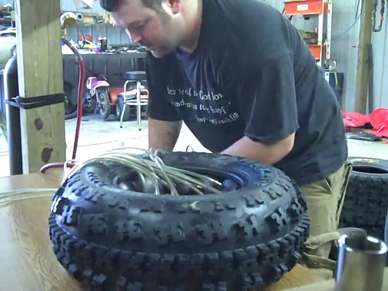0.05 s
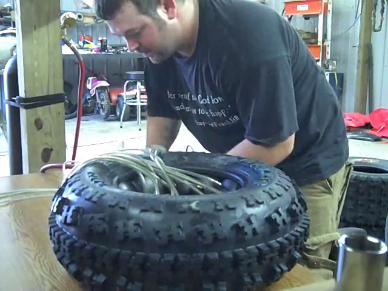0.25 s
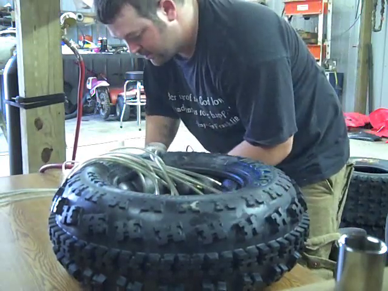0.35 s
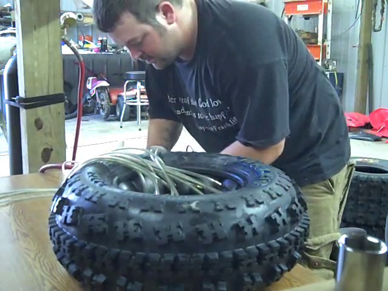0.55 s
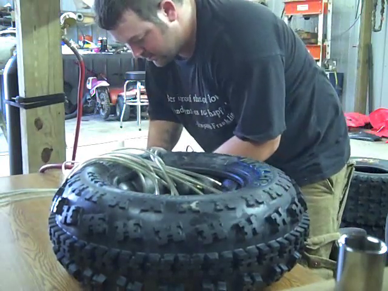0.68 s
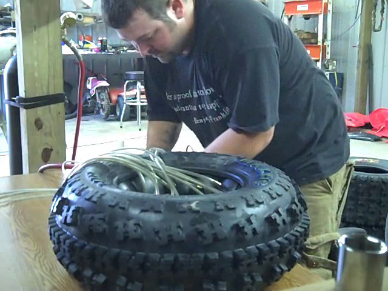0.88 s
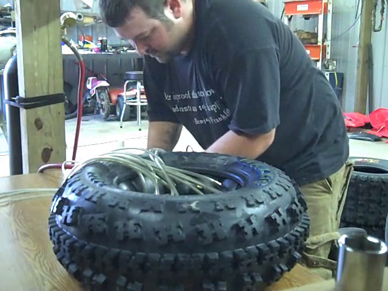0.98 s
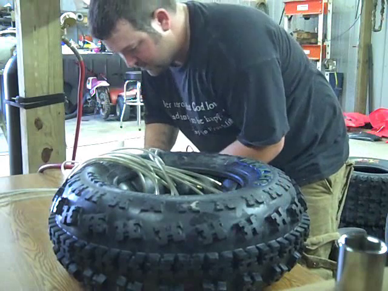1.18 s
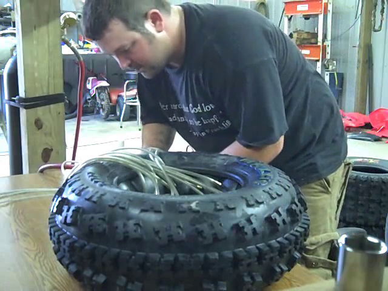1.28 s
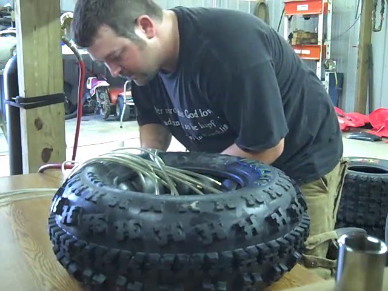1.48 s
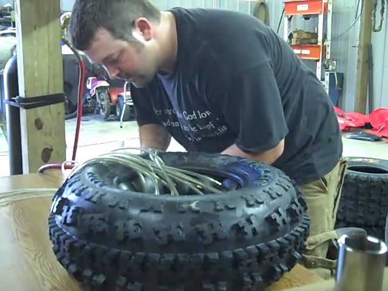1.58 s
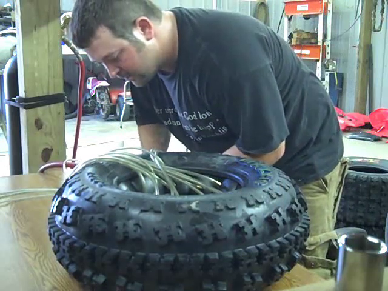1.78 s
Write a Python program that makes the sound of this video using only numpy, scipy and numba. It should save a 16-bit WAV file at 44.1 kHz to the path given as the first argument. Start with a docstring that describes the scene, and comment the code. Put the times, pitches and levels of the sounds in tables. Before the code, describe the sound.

In a small workshop, a wheel with a tire is handled on a table: it knocks hard twice, overloading the microphone, then bumps softly a few times. A fan's hum and hiss drop for a moment and return.

```python
"""Two sharp knocks sound on a wheel and tyre lying on a workshop table, among soft bumps of handling.
Each contact is an impulse that excites the same damped modes of the wheel and the same small room.
A fan hums at harmonics of its blade rate and hisses throughout. The two hard knocks overload the
microphone, and its gain control ducks the fan for a moment."""
import sys
import numpy as np
from scipy import signal
from scipy.fft import rfft, irfft
from scipy.io import wavfile
from numba import njit

SR = 44100
rng = np.random.default_rng(int(sys.argv[2]) if len(sys.argv) > 2 else 0)


def unload_audio(sound):
    """Save the sound as a 16-bit wav file, at the path given as the first command line argument."""
    columns = np.transpose(np.atleast_2d(sound))
    # keep every value between -1 and 1, then stretch to whole-number steps
    steps = np.round(np.clip(columns, -1, 1) * 32767)
    wavfile.write(sys.argv[1], SR, steps.astype(np.int16))


N = 81585

# contacts with the wheel: t/s, relative level/dB, corner f/Hz
CONTACTS = [(0.1125, -18.5, 1220), (0.2396, -18.5, 2190), (0.2462, 5.5, 7200), (0.3439, -22.5, 2400),
            (0.3502, 7.5, 6660), (0.5406, -23.5, 2260), (0.68, -23.5, 1160), (0.9633, -17, 2350)]
# modes of the wheel on the table: f/Hz, relative level/dB, decay time t60/s
WHEEL_MODES = [(283, -35.5, 0.14), (483.7, -20, .12), (521, -28, 0.062), (613, -24.5, 0.17),
               (803, -16, 0.039), (1192.5, -14.5, 0.059), (1330, -12, 0.056), (1726, -15, 0.075),
               (2057, -6.5, 0.063), (2662, -3.5, 0.034), (2802, -6.5, 0.051), (2950, -5, 0.032),
               (3601, -6.5, 0.031), (6232, -8.5, 0.022)]
# spectrum of the wheel's many short-lived modes: f/Hz, relative density level/dB
CRACK_SPECTRUM = [(30, -34), (150, -25), (350, -29.5), (550, -2.5), (900, -4), (1300, -5.5), (2700, -9),
                  (3400, -2), (5000, -5), (7000, -6.5), (10000, -12.5), (15000, -7)]
# spectrum of the workshop's reverberation: f/Hz, relative density level/dB
ROOM_SPECTRUM = [(30, -30), (150, -31), (270, -7.5), (400, -14), (550, 0.5), (900, -1), (1300, -0.5),
                 (2700, 0), (4000, -1.5), (6500, -7), (10000, -9), (15000, -11)]
# fan tones: multiple of the blade rate, level/dB
BLADE_HARMONICS = [(2, -74), (3, -71), (4, -66), (5, -67), (7, -61.5), (8, -55.5), (9, -62), (10, -67),
                   (11, -62.5), (12, -66.5), (13, -63), (14, -67.5), (17, -62.5)]
# spectrum of the fan's rushing air: f/Hz, relative density level/dB
AIR_SPECTRUM = [(20, 0), (60, -15.5), (120, -17.5), (250, -17.5), (500, -14), (900, -9.5), (1150, -0.5),
                (1450, -4), (2000, -2.5), (2700, -4.5), (3700, 0), (5000, -2), (7000, -7), (10000, -11),
                (13000, -14.5), (15500, -15.5)]


def wheel_response(ring_db=-4, crack_db=-6, crack_t60_s=0.039):
    """Modal superposition: a few damped sinusoids ring, and many short-lived modes merge into a crack."""
    t = np.arange(N) / SR
    ring = sum((-1) ** k * undb(db) * decay(t60) * np.sin(2 * np.pi * hz * t)
               for k, (hz, db, t60) in enumerate(WHEEL_MODES))
    crack = noise(CRACK_SPECTRUM) * decay(crack_t60_s)
    return undb(ring_db) * ring + undb(crack_db) * crack


def contact_forces():
    """Impulsive excitation: the softer a contact, the longer its push and the lower its corner."""
    force = np.zeros(N)
    for onset_s, db, corner_hz in CONTACTS:
        impulse = np.zeros(N)
        impulse[int(onset_s * SR)] = undb(db)
        softness = signal.butter(2, corner_hz, fs=SR, output="sos")
        force += signal.sosfilt(softness, impulse)
    return force


def room_response(gain_db=-17, build_s=0.0042, split_hz=1200, bass_t60_s=0.26, treble_t60_s=0.23):
    """Reverberation: a diffuse field builds up quickly, then decays, sooner in the treble."""
    echoes = noise(ROOM_SPECTRUM)
    bass = filtered(echoes, lambda f: 1 / (1 + (f / split_hz) ** 2))
    treble = echoes - bass
    build_up = 1 - np.exp(-np.arange(N) / SR / build_s)
    return undb(gain_db) * build_up * (bass * decay(bass_t60_s) + treble * decay(treble_t60_s))


def fan(blade_hz=153.9, flutter_db=5, whine_hz=1163, whine_width_hz=14, whine_db=-57.5, air_db=-44.5):
    """Aerodynamic sound: periodic blade passage gives harmonics, beside a whine and broadband air noise."""
    rate_hz = blade_hz * (1 + 0.0023 * drift(6.8))  # the pitch wavers slightly
    blade_phase = 2 * np.pi * np.cumsum(rate_hz) / SR
    hum = np.zeros(N)
    for harmonic, db in BLADE_HARMONICS:
        flutter = undb(flutter_db * drift(18))
        tone = np.sin(harmonic * blade_phase + rng.uniform(0, 2 * np.pi))
        hum += undb(db) * unit_rms(flutter * tone)
    whine = filtered(rng.standard_normal(N), lambda f: 1 / (1 + (2 * (f - whine_hz) / whine_width_hz) ** 2))
    return hum + undb(whine_db) * unit_rms(whine) + undb(air_db) * noise(AIR_SPECTRUM)


def undb(db):
    """Amplitude ratio of a level in decibels."""
    return 10 ** (np.asarray(db) / 20)


def unit_rms(x):
    """Normalisation to rms 1."""
    return x / np.sqrt(np.mean(x ** 2))


def filtered(x, gain):
    """Linear filtering: the spectrum is multiplied by gain(f)."""
    hz = np.arange(N // 2 + 1) * SR / N + 1e-9
    return irfft(rfft(x) * gain(hz), N)


def noise(spectrum):
    """Spectral shaping: noise of rms 1 that follows points of f/Hz, level/dB."""
    hz, db = np.array(spectrum, float).T
    white = rng.standard_normal(N)
    return unit_rms(filtered(white, lambda f: undb(np.interp(np.log(f), np.log(hz), db))))


def drift(bandwidth_hz):
    """Slow random fluctuation: low-pass noise of rms 1."""
    return unit_rms(filtered(rng.standard_normal(N), lambda f: np.exp(-(f / bandwidth_hz) ** 2)))


def decay(t60):
    """Exponential damping by 60 dB in t60 seconds."""
    return np.exp(-np.log(1000) * np.arange(N) / SR / t60)


@njit
def gain_reduction(excess_db, attack_s, hold_s, release_db_per_s):
    """Automatic gain control: the cut in dB rises toward the excess level, holds, then falls steadily."""
    reduction_db = np.empty(N)
    cut_db, hold_left = 0., 0.
    for i in range(N):
        if excess_db[i] > cut_db:
            cut_db += (excess_db[i] - cut_db) / (attack_s * SR)
        hold_left = hold_s * SR if excess_db[i] > 0 else hold_left - 1
        if hold_left < 0:
            cut_db = max(cut_db - release_db_per_s / SR, 0.)
        reduction_db[i] = cut_db
    return reduction_db


def scene():
    """Convolution: every contact sets off the impulse response of wheel and room, over the steady fan."""
    knocks = signal.fftconvolve(contact_forces(), wheel_response() + room_response())[:N]
    return (knocks + fan())[None]


def record(dry, threshold_db=-9, cutoff_hz=15600):
    """Overload: the gain falls too late to keep loud peaks from clipping; a low-pass limits the band."""
    excess_db = 20 * np.log10(np.abs(dry[0]) + 1e-9) - threshold_db
    cut_db = gain_reduction(excess_db, attack_s=0.0065, hold_s=0.24, release_db_per_s=29.5)
    clipped = np.clip(dry * undb(-cut_db), -1, 1)
    low_pass = signal.ellip(10, .1, 70, cutoff_hz, fs=SR, output="sos")
    return signal.sosfilt(low_pass, clipped)


dry = scene()
out = record(dry)
unload_audio(out)
```